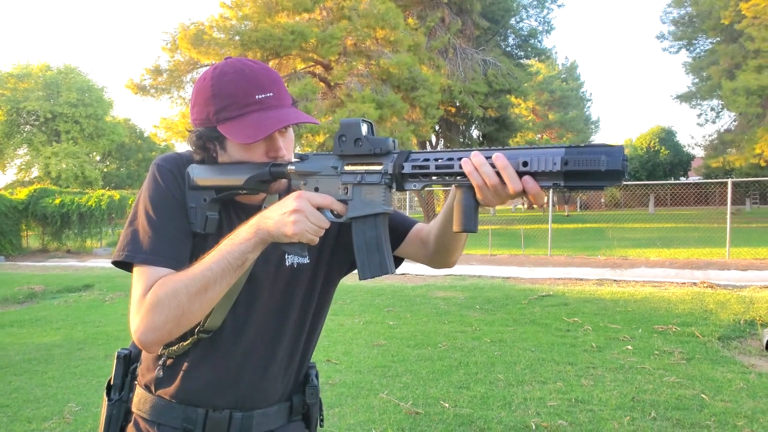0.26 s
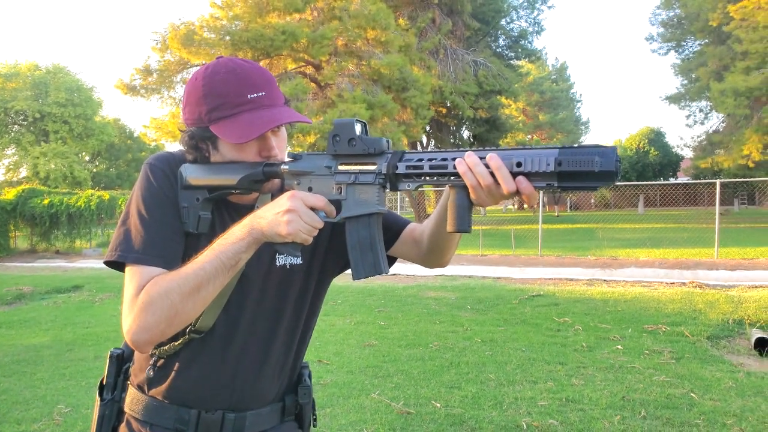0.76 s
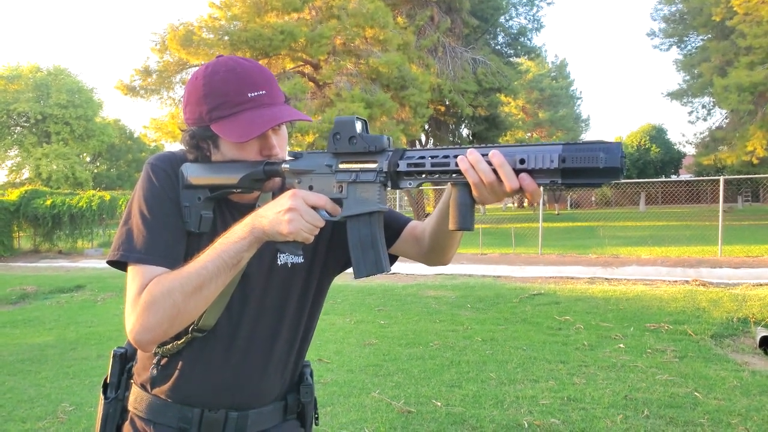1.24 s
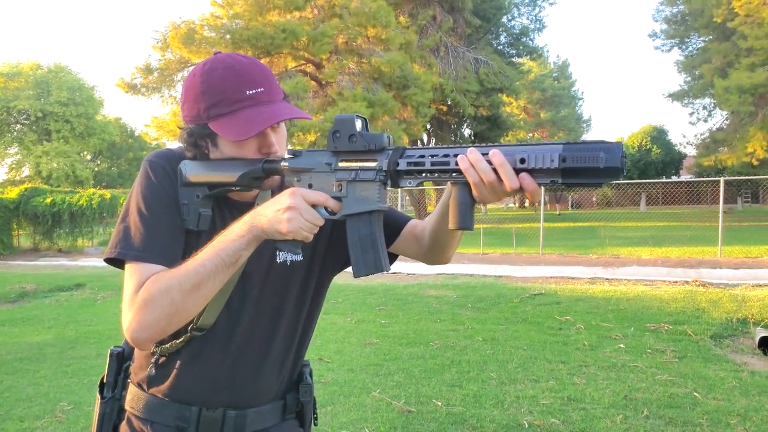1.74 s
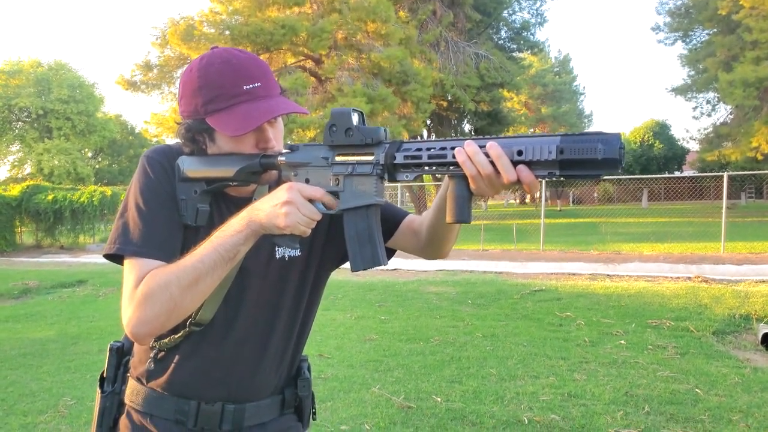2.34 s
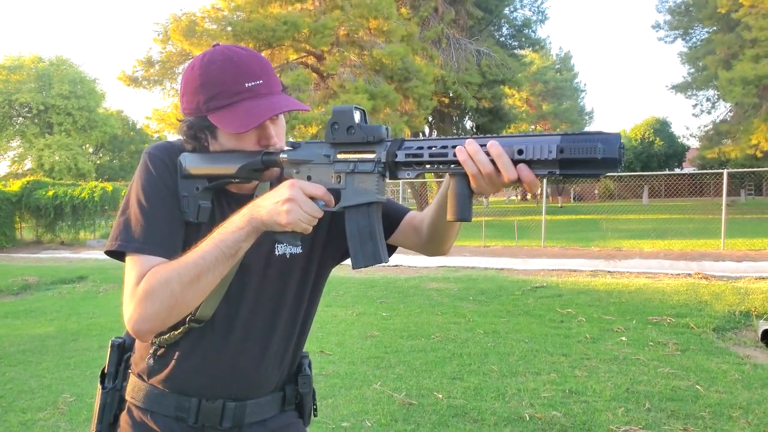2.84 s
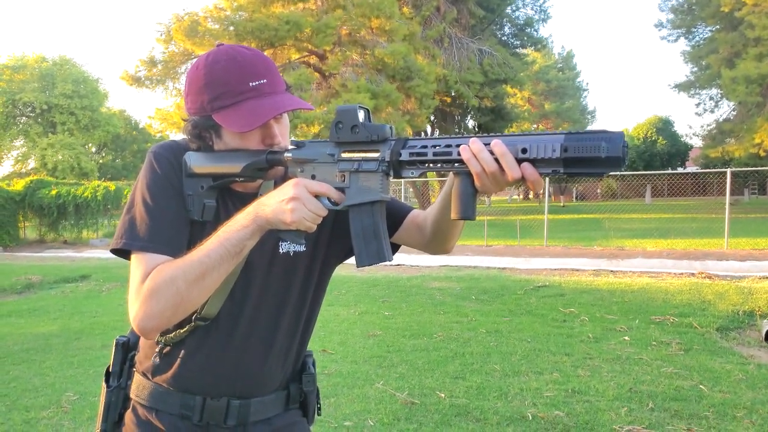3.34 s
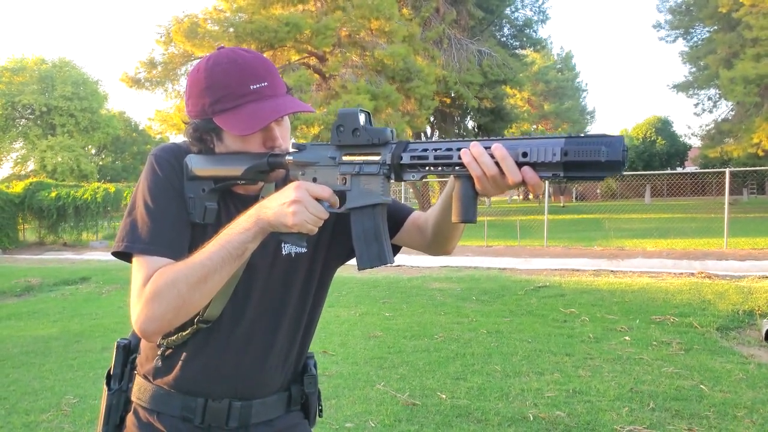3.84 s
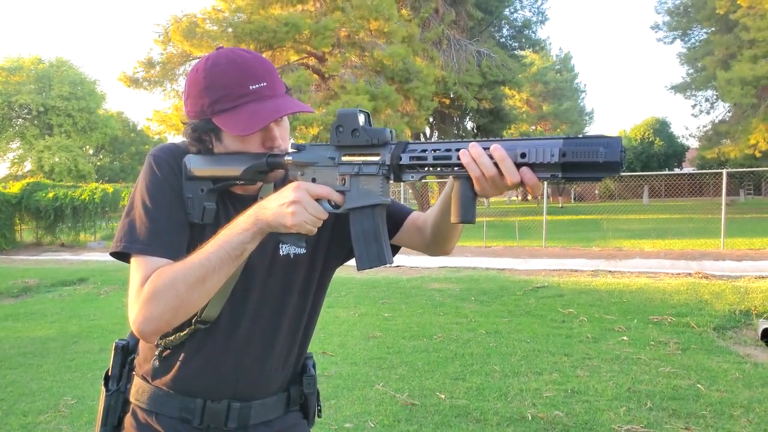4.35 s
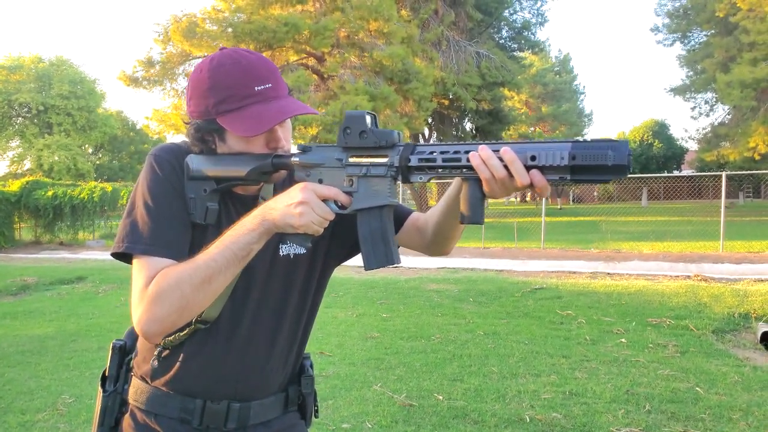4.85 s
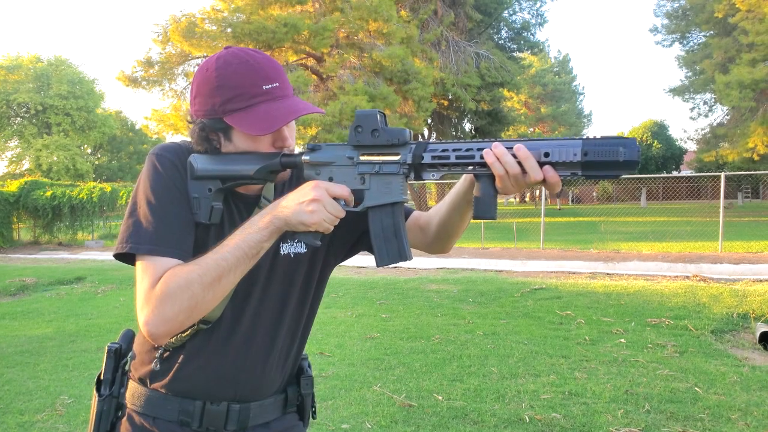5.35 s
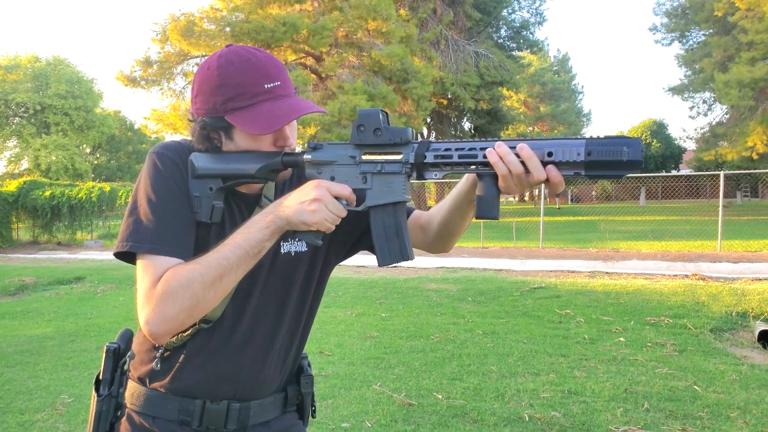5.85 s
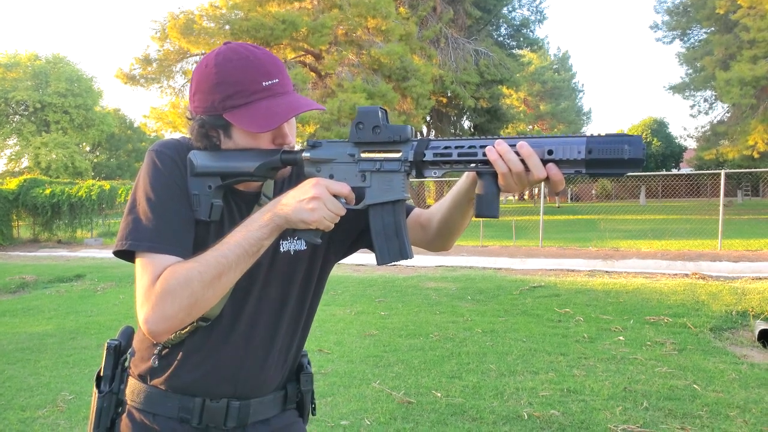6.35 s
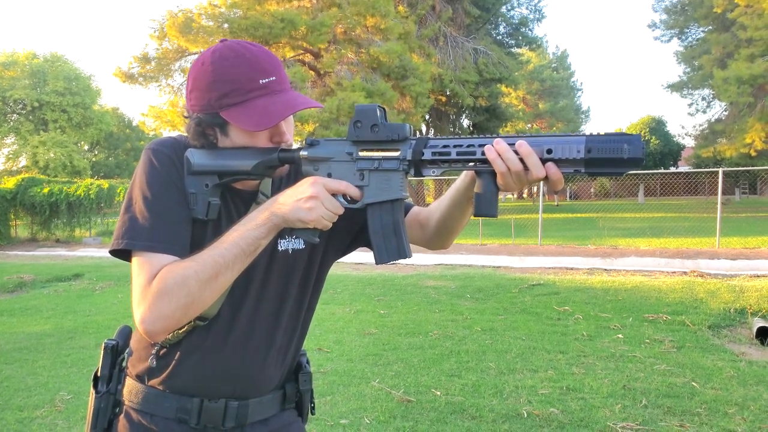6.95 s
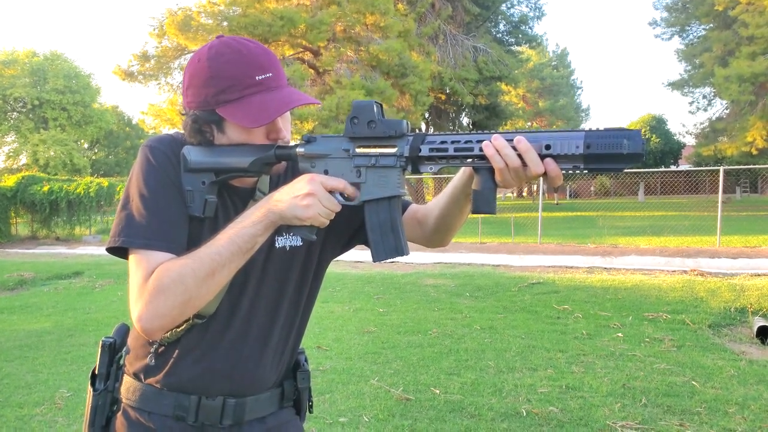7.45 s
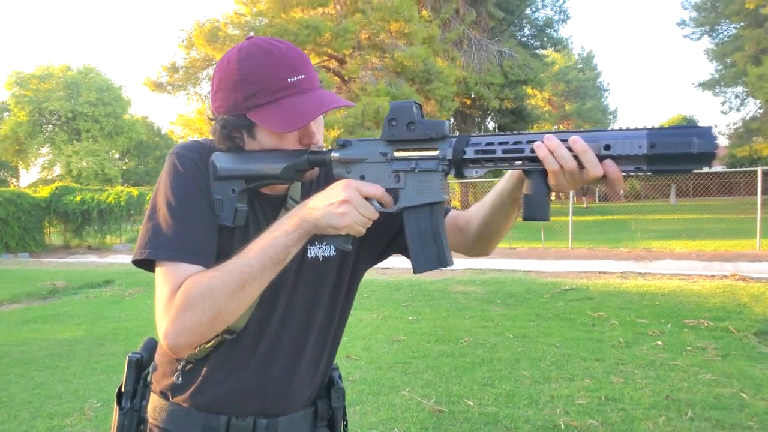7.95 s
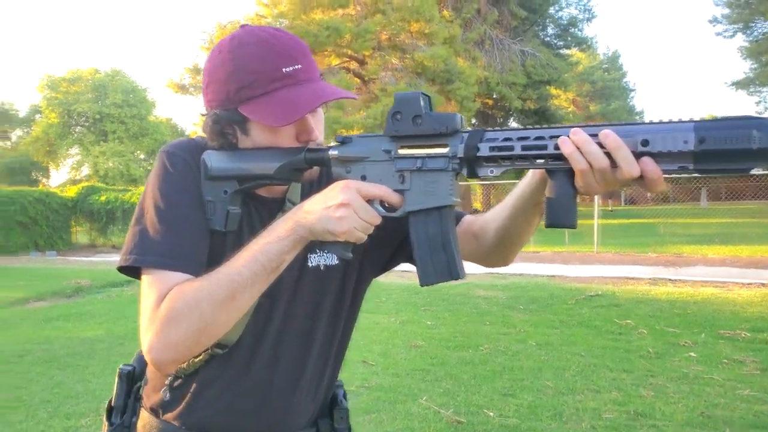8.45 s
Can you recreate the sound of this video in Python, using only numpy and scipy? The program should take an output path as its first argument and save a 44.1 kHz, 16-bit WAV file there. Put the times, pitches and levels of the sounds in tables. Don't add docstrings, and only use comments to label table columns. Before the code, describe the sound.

Very close to the microphone on open grass, an electric airsoft rifle fires single shots three to five per second. Each is a brief grinding motor whir, a sharp metallic-plastic piston clack, then a short gear rattle braking off. Trigger clicks fall between. A far metal ping follows one shot. After a short pause near the middle, firing resumes, a little more unevenly. Slight slapback echoes and low distant traffic.

```python
import sys
import numpy as np
from scipy import signal
from scipy.fft import rfft, irfft, next_fast_len
from scipy.io import wavfile
from scipy.ndimage import uniform_filter1d

SR = 44100
rng = np.random.default_rng(int(sys.argv[2]) if len(sys.argv) > 2 else 0)


def waveform_to_disk(signal):
    frames = np.transpose(np.atleast_2d(signal))
    scaled = np.clip(frames, -1, 1) * 32767
    samples = np.round(scaled).astype(np.int16)
    wavfile.write(sys.argv[1], SR, samples)


def ratio_of_db(decibels):
    return 10 ** (np.asarray(decibels, float) / 20)


N = 383669
PAD = SR // 2
M = N + 2 * PAD


def evened(x):
    return x / np.sqrt(np.mean(x ** 2) + 1e-20)


def read(points, hz):
    f, value = np.transpose(points)
    return np.interp(np.log(hz + 1), np.log(f + 1), value)


def colour(x, gain):
    size = next_fast_len(x.shape[-1])
    hz = np.fft.rfftfreq(size, 1 / SR)
    return irfft(rfft(x, size) * gain(hz), size)[..., :x.shape[-1]]


def ring(x, modes):
    out = 0
    for k, (hz, width_hz, db) in enumerate(modes):
        r = np.exp(-np.pi * width_hz / SR)
        pole = r * np.exp(2j * np.pi * hz / SR)
        top = [2 * (1 - r), -2 * (1 - r) * pole.real]
        bottom = [1, -2 * pole.real, r * r]
        out = out + (-1) ** k * ratio_of_db(db) * signal.lfilter(top, bottom, x)
    return out


def add(mix, start_s, sound):
    part = mix[..., round(start_s * SR) + PAD:][..., :sound.shape[-1]]
    part += sound[..., :part.shape[-1]]


def ramp(t, start_s, length_s):
    return np.clip((t - start_s) / np.maximum(length_s, 1e-4), 0, 1)


# frequency in Hz, density in dB per Hz.
FIELD = [(15, -45), (25, -15.5), (48, -6), (64, -1.5), (81, -5), (110, -1.5), (138, -10.5), (156, -13.5),
         (260, -22), (296, -19.5), (588, -23.5), (759, -20), (1360, -34), (4990, -40.5), (11000, -73.5),
         (14300, -104), (22000, -120)]
FIELD_DB = -42
# time in seconds, firing rate in Hz, rumble in dB, whine in dB.
ENGINE = [(2.5, 90.2, -49, -70), (3.05, 82.98, -41.5, -62.5), (3.6, 76.02, -47, -53),
          (4.05, 72.94, -41, -48.5), (4.45, 69.06, -44.5, -57.5), (5.0, 68.05, -56.5, -74),
          (5.5, 81, -48, -61), (6.2, 81.93, -46, -58.5), (6.55, 80.44, -36, -59),
          (7.0, 77.86, -45.5, -54.5), (7.6, 81.14, -43.5, -52), (8.0, 84.13, -33.5, -52),
          (8.55, 87.8, -39, -47.5), (8.7, 88.34, -41, -47)]
# multiple of the firing rate, level in dB.
WHINE = [(2, -6.5), (3, -6.5), (4, -5), (5, -9.5), (6, -4.5)]
IDLE_HZ, IDLE_DB, IDLE_MID_S, IDLE_SPAN_S = 56.83, -49.5, 5.2, 1.3


def field():
    t = np.arange(N) / SR
    swell = evened(colour(rng.standard_normal(N), lambda hz: 1 / (1 + (hz / 3) ** 2)))
    late_swell = swell[::-1]

    shared, b = rng.standard_normal((2, N))
    apart = colour(b, lambda hz: np.clip(hz / 1500, .2, 1))
    both = np.array([shared + apart, shared - apart])
    wash = evened(colour(both, lambda hz: ratio_of_db(read(FIELD, hz))))

    s, *columns = np.transpose(ENGINE)
    firing_hz, rumble_db, whine_db = (np.interp(t, s, c) for c in columns)
    phase = 2 * np.pi * np.cumsum(firing_hz) / SR
    whine = 0
    for multiple, db in WHINE:
        k = round(multiple)
        whine = whine + ratio_of_db(db + 2.5 * np.roll(swell, k * SR)) * np.sin(k * phase)
    engine = ratio_of_db(rumble_db + 1.9 * swell) * np.sin(phase) + ratio_of_db(whine_db) * whine
    idle_level = ratio_of_db(IDLE_DB + 2.5 * late_swell) * np.exp(-((t - IDLE_MID_S) / IDLE_SPAN_S) ** 4)
    engine = engine + idle_level * np.sin(2 * np.pi * IDLE_HZ * t)
    fade_in = np.clip(t - s[0] + .5, 0, 1)
    return ratio_of_db(FIELD_DB + 0.67 * late_swell) * wash + np.sqrt(2) * engine * fade_in


def insects():
    band = ring(rng.standard_normal((2, N)), [(9570, 700, 0)])
    return ratio_of_db(-77.5) * evened(ring(band, [(9600, 900, 0)]))


# motor start in seconds, piston release in seconds, blow in dB,
# excess of slip and deficit of slam in dB, gear grind in dB.
FIRST_STRING = [(0.1032, 0.1565, -9.5, 3, 0.5), (0.3803, 0.4358, -11.5, 3.5, 0),
                (0.717, 0.771, -9, 3.5, -0.5), (0.9005, 0.9568, -10, 2, -1), (1.0831, 1.1376, -10, 3, 0),
                (1.2827, 1.3383, -9.5, 2, -.7), (1.5984, 1.6516, -11, 2, -0.5),
                (1.8767, 1.9312, -9.5, 3.5, 0.1), (2.0837, 2.1404, -10.5, 1.5, 0.5),
                (2.2685, 2.3238, -10, 1.5, 1), (2.461, 2.5168, -11.5, 1, -0.1),
                (2.792, 2.8469, -10.5, 3.5, -0.5), (3.0842, 3.1435, -10.5, 0, -0.7),
                (3.3871, 3.4443, -11.5, 2.5, 0), (3.6042, 3.6601, -10, 1.5, -0.5),
                (3.8073, 3.8621, -11.5, 2.5, 0), (4.1279, 4.1874, -9, 1.5, -.7),
                (4.4749, 4.5294, -11, -0.3, 0)]
SECOND_STRING = [(5.3336, 5.386, -18.5, 3.5, 0.1), (5.5084, 5.5649, -9.5, 1.5, 0.2),
                 (5.671, 5.7265, -21.5, 5.5, .7), (5.8426, 5.8995, -12, 1.5, -0.6),
                 (6.0624, 6.1153, -11.5, 2.5, -0.5), (6.309, 6.3646, -12.5, 2, 0.4),
                 (6.4985, 6.554, -12.5, 1.5, 0.1), (6.7091, 6.7625, -12, 2, 0.5),
                 (7.0288, 7.083, -11, 1.5, 0), (7.324, 7.3826, -11.5, 2.5, .7),
                 (7.5212, 7.5764, -12, 2, 0.6), (7.7167, 7.7691, -14.5, 3, 1),
                 (7.9856, 8.0412, -15.5, 2.5, 1), (8.3039, 8.3586, -17.5, 0.7, 3),
                 (8.5936, 8.6493, -12.5, 3, 0.8)]
SHOTS = FIRST_STRING + SECOND_STRING
EARLIER = (-.09, -.036, -10, 0, 0)
CYCLE_END_S = .2
USUAL_BLOW_DB = -9
GEAR_DB, WIND_DB_PER_S, RUN_DB_PER_S = -15.5, (0.36, 0.36, 0.1), 0.233
BLOW_TO_RUN = 0.27
TAKE_UP_S, JOLT_S, JOLT_DB = (0.0032, 0, 0.0064), 0.0022, (1.5, 3, 4)
SPIN_UP_S, STANDING_DB = (0.011787, 0.0052, 0.0057), (-11, -3, -11.5)
WOUND_DB, STRAIN_DB = (1.58, -1.5, -2.3), (1.5, -2.5, 9)
SLACK_S, SLACK_DB = 0.0013, -8.5
LET_GO_S, FREE_DB = 0.0079, (-9, -18, -2.5)
CATCH_S, CATCH_RISE_S, CATCH_DB = (0.0205, 0.02, .008), (0.0053, 0.0063, 0.014), (3, -5, 4.5)
BITE_S, BITE_LENGTH_S, BITE_DB = 0.0248, 0.0014, (3, -6, 1.5)
RUN_DOWN_DB_PER_S = (-250, -10.5, -170)
BRAKE_S, BRAKE_FALL_S, BRAKE_DB = 0.061, 0.0092, (-15, -23.5, -11.5)
COAST_DB_PER_S = (-150, -50.5, -210)
LATCH_S, LATCH_LENGTH_S, LATCH_DB = 0.0624, 0.0044, (-0.3, 4.5, -0.6)


def cycle(start, release, blow_db):
    t = np.arange(start, release + CYCLE_END_S, 1 / SR) - release
    col = lambda v: np.array(v)[:, None]
    bump = lambda mid_s, length_s: np.exp(-((t - mid_s) / length_s) ** 2)

    standing = 1 - ramp(t, start - release + col(TAKE_UP_S), col(SPIN_UP_S))
    wind = col(WOUND_DB) + col(STANDING_DB) * standing
    wind = wind + col(JOLT_DB) * bump(t[0], JOLT_S)
    wind = wind + col(STRAIN_DB) * ramp(t, start - release, release - start)
    wind = wind + col(WIND_DB_PER_S) * start

    caught = ramp(t, col(CATCH_S), col(CATCH_RISE_S))
    run = col(FREE_DB) + (col(CATCH_DB) - col(FREE_DB)) * caught
    full_s = col(CATCH_S) + col(CATCH_RISE_S)
    run = run + col(RUN_DOWN_DB_PER_S) * np.clip(t - full_s, 0, BRAKE_S - full_s)
    late = np.maximum(t - BRAKE_S, 0)
    run = run + col(BRAKE_DB) * (1 - np.exp(-late / BRAKE_FALL_S)) + col(COAST_DB_PER_S) * late
    run = run + RUN_DB_PER_S * start + BLOW_TO_RUN * (blow_db - USUAL_BLOW_DB)
    run = run + col(LATCH_DB) * bump(LATCH_S, LATCH_LENGTH_S)
    run = run + SLACK_DB * bump(-SLACK_S, SLACK_S) + col(BITE_DB) * bump(BITE_S, BITE_LENGTH_S)

    free = ramp(t, -LET_GO_S, LET_GO_S)
    return ratio_of_db(GEAR_DB + (1 - free) * wind + free * run)


# mode in Hz, width in Hz, level in dB.
CASING = [(1346, 140, -15), (2117, 140, -9), (2676, 340, -8.5), (3534.3, 574, 0), (4127, 255, 0.5397),
          (4436, 300, -5), (6440, 720, -12.5)]
# mode in Hz, width in Hz, level in dB.
STOCK = [(444, 350, -22), (639, 50, -1), (706, 131, 0), (842, 100, 5)]
# frequency in Hz, density in dB per Hz.
FIZZ = [(180, -58.5), (300, -35.5), (643, -7.5), (1090, -18.5), (1360, -8.5), (1720, -14), (4050, 1.5),
        (5370, -3.5), (7990, -11.5), (12300, -11.5), (15800, -17)]
PATCH_DB, PATCH_HZ, PATCH_STEP = 2.5, 60, 64


def gears():
    power = np.zeros((3, M))
    for start, release, blow_db, _, grind_db in [EARLIER] + SHOTS:
        share_db = grind_db * np.array([[1], [0], [.5]])
        add(power, start, cycle(start, release, blow_db) * ratio_of_db(share_db))

    lump_gain = lambda hz: (hz > 30) / (1 + (hz / 200) ** 2)
    lumps = evened(colour(rng.standard_normal((3, M)), lump_gain))
    click_db = 0.5 * lumps[0] + 1.0 * rng.exponential(1, M)
    teeth = evened(rng.standard_normal((2, M)) * ratio_of_db(click_db))
    slack = np.clip(-20 * np.log10(power[0] + 1e-9) - 26, 0, 12) / 12
    power *= ratio_of_db(lumps * (1.0 + 2.9 * slack))

    grains = teeth + 0.87 * rng.standard_normal((2, M))
    fizz = evened(colour(grains, lambda hz: ratio_of_db(read(FIZZ, hz))))
    knock = ring(ring(power[1] * teeth, STOCK), [(795.96, 1320.0, 0.029)])

    steps = rng.standard_normal((len(CASING), M // PATCH_STEP + 1))
    slow = evened(colour(steps, lambda hz: 1 / (1 + (hz / PATCH_STEP / PATCH_HZ) ** 2)))
    patches = np.repeat(slow, PATCH_STEP, axis=1)[:, :M]
    grind = 0
    for k, mode in enumerate(CASING):
        grind = grind + (-1) ** k * ring(power[0] * teeth * ratio_of_db(PATCH_DB * patches[k]), [mode])
    return ratio_of_db(14) * grind + ratio_of_db(8.0) * knock + ratio_of_db(-5) * power[2] * fizz


# time in seconds, peak in dB, tone above 4.5 kHz in dB.
RESETS = [(0.8841, -14, -2.5), (1.4502, -40, -0.5), (1.8424, -34, 1), (2.0438, -16.5, 0), (2.2455, -15, 0),
          (2.9704, -15, -2), (3.243, -16.5, -3), (3.2566, -40.5, -1), (3.5217, -23, 0), (3.9927, -12, -2.5),
          (4.0127, -22, -5), (4.0355, -40.5, -4), (5.464, -17, -3), (7.1927, -13, -3), (7.2053, -22, -9),
          (7.865, -18.5, 0)]
# time in seconds, peak in dB, tone above 4.5 kHz in dB.
TOUCHES = [(0.037, -21, 2.5), (0.3228, -31.5, 1), (0.6625, -36, 8), (0.677, -42, 8), (1.587, -50.5, 2.5),
           (3.0236, -33, 4), (3.3153, -36, -2), (4.116, -44, 4.5), (4.4481, -23.5, -4.5), (4.465, -36, 8),
           (4.6671, -24, -1), (4.6923, -24, 1), (4.728, -31, 4), (4.751, -38, 6), (4.7025, -32, -7),
           (5.321, -46.5, 6.5), (6.209, -27.5, 1.5), (6.2596, -29, -0.5), (6.2852, -21.5, -4.5),
           (6.684, -18, -3.5), (6.934, -20.5, -2), (7.225, -32, 0.5), (7.2545, -15, 8), (7.2712, -22, 8),
           (7.8946, -25.5, -4.5), (7.937, -23.5, -16.5), (8.1837, -29.5, 0), (8.2632, -16, 6),
           (8.2798, -17, 4), (8.5343, -24, 9), (8.551, -28, 7)]
# stock share in dB, length in seconds, rattle in dB, rattle t60 in seconds.
RESET, TOUCH, SETTLE = (-10, 0.0065, -16, 0.03), (-34, 0.0012, -13, 0.03), (-30, .003, -12, .03)
SETTLE_FROM_S, SETTLE_SPAN_S = .07, .17
SETTLE_DB, SETTLE_DB_PER_S, SETTLE_SPREAD_DB = -29, -90, 8
# frequency in Hz, density in dB per Hz.
TICK = [(590, -19.5), (1000, -7.5), (1700, -3.5), (3520, 7), (5210, -0.5), (6340, 5), (8170, -10.5),
        (9270, -10), (15800, -22.5)]
# time in seconds, peak in dB, t60 in seconds.
PINGS = [
    (3.3555, -21.5, 0.26),
    (5.0276, -30, 0.18),
]
# mode in Hz, width in Hz, level in dB.
TARGET = [(2824, 210, -2.5), (4530, 2600, -15.5), (6845, 400, -7), (8900, 700, -5.5), (9717.2, 730, -8.5),
          (12400, 3030, -33.5)]


def ticks():
    rows = [(*r, *RESET) for r in RESETS] + [(*r, *TOUCH) for r in TOUCHES]
    for (_, release, *_), draws in zip(SHOTS, rng.random((len(SHOTS), 9, 3))):
        for when, size, tone in draws:
            after_s = SETTLE_SPAN_S * when
            db = SETTLE_DB + SETTLE_DB_PER_S * after_s - SETTLE_SPREAD_DB * size
            rows.append((release + SETTLE_FROM_S + after_s, db, 8 * tone - 12, *SETTLE))

    bright, dull, low, far = np.zeros((4, 2, M))
    t = np.arange(2000) / SR
    for s, db, tone_db, stock_db, length_s, rattle_db, t60_s in rows:
        grain = rng.standard_normal((2, len(t)))
        rattle = grain * ratio_of_db(db + rattle_db - 60 * t / t60_s)
        snap = grain * ratio_of_db(db - 3.0) * np.exp(-(t / length_s) ** 2)
        add(dull, s, snap + rattle)
        add(bright, s, (snap + ratio_of_db(-8) * rattle) * ratio_of_db(tone_db))
        add(low, s, snap * ratio_of_db(stock_db))

    t = np.arange(12000) / SR
    for s, db, t60_s in PINGS:
        fall = ratio_of_db(db - 60 * t / t60_s) + ratio_of_db(db - 8.5 - 60 * t / 0.033)
        add(far, s, rng.standard_normal((2, len(t))) * fall)

    share = lambda hz: 1 / (1 + (hz / 4500) ** 4)
    snaps = colour(dull, lambda hz: share(hz) * ratio_of_db(read(TICK, hz)))
    snaps = snaps + colour(bright, lambda hz: (1 - share(hz)) * ratio_of_db(read(TICK, hz)))
    return ratio_of_db(4.5) * snaps + ratio_of_db(20.5) * ring(low, STOCK) + ratio_of_db(6.0) * ring(far, TARGET)


LOADED_HZ, PULL_S, RACE_HZ, RACE_S = 770, .016, 240, 0.04005
SLOW_FROM_S, SLOW_HZ_PER_S = .044, 17000
MOTOR_DB, MOTOR_FREE_DB, MOTOR_JITTER = -12, 1, 0.049


def motor():
    out = np.zeros((2, M))
    for start, release, blow_db, _, _ in SHOTS:
        t = np.arange(start, release + CYCLE_END_S, 1 / SR) - release
        hz = LOADED_HZ * (1 - np.exp(-(t - t[0]) / PULL_S)) + RACE_HZ * ramp(t, 0, RACE_S)
        hz = hz - SLOW_HZ_PER_S * np.maximum(t - SLOW_FROM_S, 0)
        jitter = evened(uniform_filter1d(rng.standard_normal(len(t)), size=200))
        hz = np.maximum(hz, 0) * (1 + MOTOR_JITTER * jitter)
        level = cycle(start, release, blow_db)[1] * ratio_of_db(MOTOR_DB + MOTOR_FREE_DB * (t > 0))
        level = level * np.clip(hz / 580, 0, 1) ** 4
        turns = np.cumsum(hz) / SR + rng.random((2, 1))
        add(out, start, level * np.sin(2 * np.pi * turns))
    return out


# time from the release in seconds,
# metal in dB, stock in dB, air puff in dB, length in seconds.
SLIP = [
    (-.008, -44.5, -45, -21, .003),
    (0, -11, -37, -25, 0.0011),
    (.003, -9.5, -26, -27, 0.002),
    (.0056, -15, -26.5, -26, .0016),
]
SLAM = [
    (0.0092, -26, -8, -14, .002),
    (0.011, -9.5, -11, -22, 0.002067),
    (0.0147, -18, -14, -16, 0.0012),
]
# mode in Hz, width in Hz, level in dB.
PISTON = [(1271, 55, 3.5), (1952, 260, 6), (2760, 1150, 1.5), (5077.8, 130, -11.5), (6070, 930, -5),
          (8100, 160, -16.5), (13000, 3000, -16)]
BARREL = [(108, 69, 0.0), (175, 52, 1.84), (335, 80, 13)]
BLOW_TO_STOCK = 0.41
CYLINDER_HZ, BLOW_JITTER_S = 2880, .0002


def piston():
    drive, t = np.zeros((3, 2, M)), np.arange(400) / SR
    habit = .6 * rng.standard_normal((len(SLIP + SLAM), 2, len(t)))
    habit = habit + 1.3 * np.sin(2 * np.pi * CYLINDER_HZ * t)
    for _, release, blow_db, slip_db, _ in SHOTS:
        held = ratio_of_db((BLOW_TO_STOCK - 1) * (blow_db - USUAL_BLOW_DB) - 1.5)
        force_db = [blow_db + slip_db] * len(SLIP) + [blow_db - slip_db] * len(SLAM)
        for usual, db, blow in zip(habit, force_db, SLIP + SLAM):
            after_s, metal_db, stock_db, puff_db, length_s = blow
            scrape = usual + 1.365 * rng.standard_normal(usual.shape)
            scrape = scrape * np.exp(-(t / length_s) ** 2)
            push = np.sin(np.pi * np.minimum(t / length_s / 2, 1)) * np.ones((2, 1))
            parts = np.array([ratio_of_db(metal_db) * scrape,
                              held * ratio_of_db(stock_db) * scrape,
                              held * ratio_of_db(puff_db) * push])
            when_s = release + after_s + BLOW_JITTER_S * rng.standard_normal()
            add(drive, when_s, ratio_of_db(db) * parts)
    metal = colour(ring(drive[0], PISTON), lambda hz: 1 / np.sqrt(1 + (hz / 7500) ** 4))
    return ratio_of_db(22) * metal + ratio_of_db(25.5) * ring(drive[1], STOCK) + ratio_of_db(3.0) * ring(drive[2], BARREL)


# delay in seconds, level in dB.
WALLS = [
    (0.174, -24),
    (0.183, -36),
    (.3, -59),
    (.477, -34),
]


def walls(x):
    out = np.zeros_like(x)
    for delay_s, db in WALLS:
        out += ratio_of_db(db) * np.roll(x, round(delay_s * SR), axis=1)
    return ring(out, [(2310, 1200, -2.5), (900, 770, -11)])


# frequency in Hz, t60 in seconds.
ECHO = [(300, 0.23), (1000, 0.51), (2000, 1), (2750, 0.8342), (4000, 0.5793), (6000, 0.45), (10000, 0.61)]


def trees(x):
    hz, t, z = signal.stft(rng.standard_normal((2, SR)), SR, nperseg=256)
    z = z * ratio_of_db(-60 * t / read(ECHO, hz)[:, None]) * np.clip(t / 0.016, 0, 1)
    tail = signal.istft(z, SR, nperseg=256)[1]
    return signal.fftconvolve(x[None], tail / np.linalg.norm(tail[0]), axes=1)[:, :M]


# frequency in Hz, level in dB.
BODY = [(40, -35.5), (90, 2.5), (4600, -2), (5050, 0.5), (5350, -9), (5900, -4), (7000, -3), (7700, -5),
        (8600, 1), (12000, 5.5)]


def ports(pair, likeness, turn, lean):
    same = lambda hz: np.clip(read(likeness, hz), 0, 1)
    shade = lambda hz, side: ratio_of_db(read(BODY, hz) + side * read(lean, hz) / 2)
    left = colour(pair[0], lambda hz: shade(hz, 1))
    alike = colour(pair[0], lambda hz: same(hz) * np.exp(-1j * read(turn, hz)) * shade(hz, -1))
    unlike = colour(pair[1], lambda hz: np.sqrt(1 - same(hz) ** 2) * shade(hz, -1))
    return np.array([left, alike + unlike])


# frequency in Hz, likeness from 0 to 1.
GEAR_SAME = [(900, 0.97), (2000, 0.78), (2800, .5), (3600, 0.68), (4300, 0.45), (4800, 0.14), (6000, 0.27),
             (8500, 0.02)]
BLOW_SAME = [(300, 0.98), (900, 0.9749), (1400, 0.86), (1900, 0.3), (2500, 0.69), (3000, 0.98),
             (3600, 0.38), (4500, 0.15), (5500, 0.32), (8000, 0.74), (10000, 0.092)]
# frequency in Hz, phase in radians.
GEAR_TURN = [(300, 0), (2300, .45), (2850, .75), (3200, 1.5), (3900, 1.6), (4400, .6), (5300, 2.9),
             (7200, 3.1)]
BLOW_TURN = [(300, 0), (900, .25), (1400, .1), (1800, 2.9), (2500, 3.3), (3000, 3.6), (3500, 1.7),
             (4200, 1.8), (5500, 3.4), (8000, 5.8)]
# frequency in Hz, left over right in dB.
GEAR_LEAN = [(200, 1), (1300, 2.5), (2400, 1), (3400, -1), (4000, 5.5), (4600, -7), (5500, 7.5),
             (6500, 8.5), (7600, 1.5), (9600, -8), (12500, -11.5), (15300, -1.5)]
BLOW_LEAN = [(200, 0), (1300, 3), (1700, -1), (3000, -3), (3500, -5), (4500, 0), (6000, 3.5), (11500, -8.5)]
# frequency in Hz, level in dB.
FAR = [(500, -1.5), (1500, -2.5), (2700, -11), (4300, -4.5), (6800, -1), (7600, -4), (12000, -8)]


def scene():
    blows = piston()
    works = gears() + ticks() + motor()
    near = ports(works, GEAR_SAME, GEAR_TURN, GEAR_LEAN)
    near = near + ports(blows + walls(blows), BLOW_SAME, BLOW_TURN, BLOW_LEAN)
    far = ratio_of_db(-15.0) * trees(colour((works + blows)[0], lambda hz: ratio_of_db(read(FAR, hz))))
    return (near + far)[:, PAD:PAD + N] + field() + insects()


def low_pass(x):
    return signal.sosfilt(signal.butter(12, 15920, fs=SR, output="sos"), x)


def record(dry):
    mix = np.clip(dry, -.99, .99)
    return low_pass(mix)


dry = scene()
out = record(dry)
waveform_to_disk(out)
```